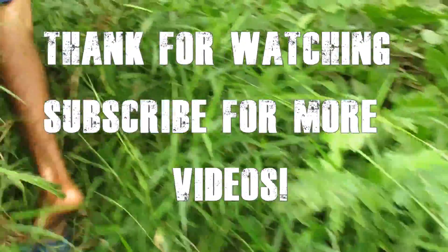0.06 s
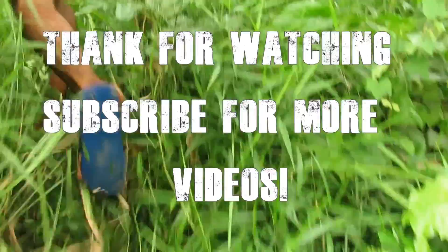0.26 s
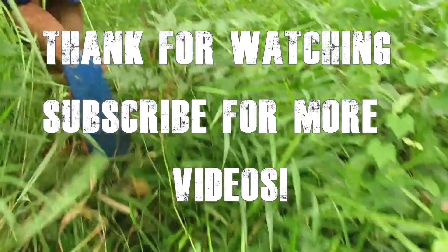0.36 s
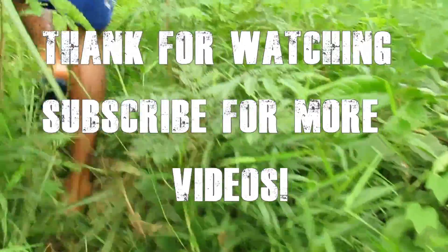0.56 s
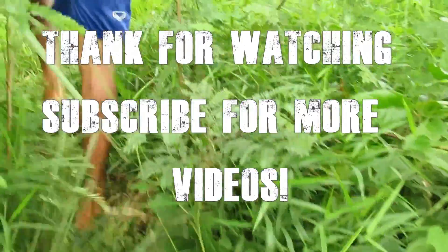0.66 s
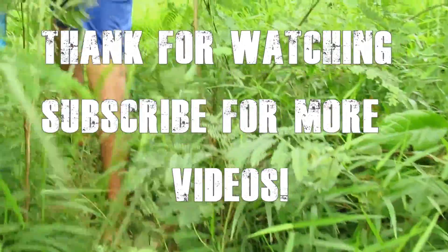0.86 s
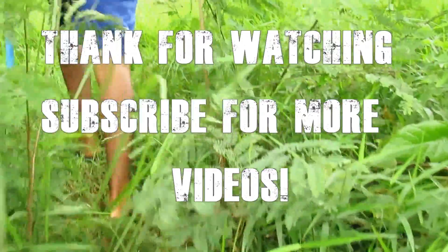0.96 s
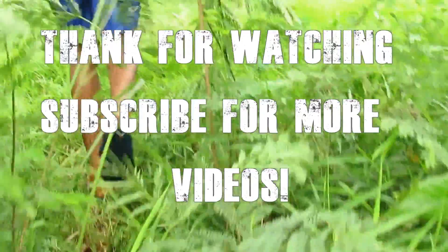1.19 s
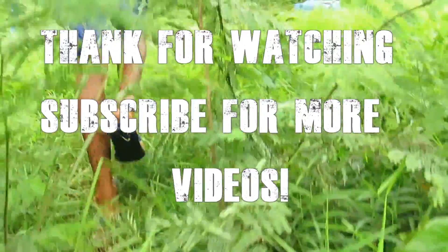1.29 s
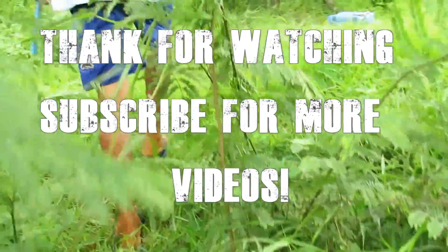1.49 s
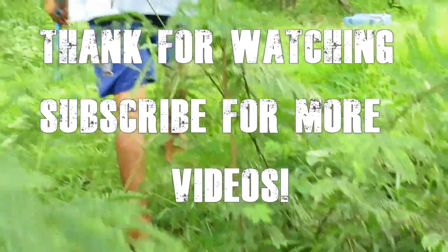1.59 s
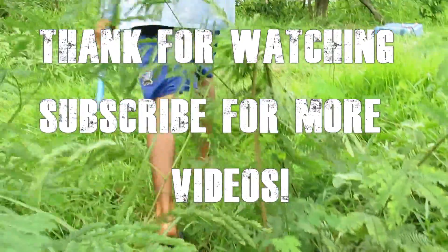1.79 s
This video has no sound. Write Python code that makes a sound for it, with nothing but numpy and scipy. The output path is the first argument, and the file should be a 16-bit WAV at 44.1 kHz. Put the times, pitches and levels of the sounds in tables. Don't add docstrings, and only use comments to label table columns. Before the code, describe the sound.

Steady swishing and crunching of someone walking through thick weeds, twigs cracking, wind rumbling low

```python
import sys
import numpy as np
from scipy import signal
from scipy.fft import rfft, irfft, next_fast_len
from scipy.io import wavfile
from scipy.ndimage import uniform_filter1d, map_coordinates

SR = 44100
rng = np.random.default_rng(int(sys.argv[2]) if len(sys.argv) > 2 else 0)


def put_to_file(sound):
    columns = np.atleast_2d(sound).T
    safe = np.clip(columns, -1, 1)
    whole_steps = np.round(safe * 32767)
    wavfile.write(sys.argv[1], SR, whole_steps.astype(np.int16))


def volts(x):
    e = np.asarray(x, float) / 20
    return 10 ** e


N = 81585

NEAR_LEAD_S, FAR_LEAD_S = 2.7e-5, 1.1e-5
FLAT = [(100, 0), (15000, 0)]


def unit(x):
    return x / np.sqrt(np.mean(x ** 2) + 1e-20)


def along(points, hz):
    f, v = np.transpose(points)
    return np.interp(np.log(hz + 1), np.log(f + 1), v)


def curve(rows):
    return np.interp(np.arange(N) / SR, *np.transpose(rows))


def wobble(rate):
    knots = rng.standard_normal(int(N * rate / SR) + 4)
    return map_coordinates(knots, [np.arange(N) * rate / SR])


def filtered(x, response):
    m = next_fast_len(N + 8192)
    return irfft(rfft(x, m) * response(np.fft.rfftfreq(m, 1 / SR)), m)[..., :N]


def coloured(noise, spectrum):
    return unit(filtered(noise, lambda hz: volts(along(spectrum, hz))))


def wavelet(s, hz, cycles, phase):
    out = np.zeros(N)
    reach = int(5 * cycles / hz * SR) + 2
    near = np.arange(max(int(s * SR) - reach, 0), min(int(s * SR) + reach, N))
    u = (near / SR - s) * hz
    out[near] = np.exp(-.5 * (u / cycles) ** 2) * np.cos(2 * np.pi * u + phase)
    return out


def grains(count, low_hz, high_hz, cycles, spread_db):
    u, k = rng.random((count, 4)), np.arange(256)
    hz = low_hz * (high_hz / low_hz) ** u[:, 1:2]
    rarity = np.minimum(-np.log(u[:, 2:3] + 1e-9), 3)
    size = volts(spread_db * rarity) * np.sqrt(hz)
    ring = np.sin(2 * np.pi * (hz * k / SR + u[:, 3:]))
    tick = size * np.exp(-k / SR * hz / cycles) * ring
    place = (u[:, :1] * N).astype(int) + k
    return unit(np.bincount(place.ravel(), tick.ravel(), N + 256)[:N] * 1.)


def patches(x, depth_db, size, order):
    z = signal.stft(x, nperseg=size)[2]
    field = rng.standard_normal(z.shape[1:])
    field = uniform_filter1d(field, size=order[0], axis=0)
    field = uniform_filter1d(field, size=order[1], axis=1)
    return signal.istft(z * volts(depth_db * unit(field)), nperseg=size)[1][:, :N]


# f/Hz, likeness [0 to 1]
LIKENESS = [(100, 1), (300, 0.95), (1000, 0.92), (2200, 0.9), (4000, 0.5), (7000, 0.6), (14000, 0.68)]


def ports(pair, spectrum, lead_s):
    left_db = -0.1

    def share(hz):
        turn = np.arccos(np.clip(along(LIKENESS, hz), -1, 1)) / 2
        return volts(along(spectrum, hz)) * [np.cos(turn), np.sin(turn)]

    def lead(hz):
        early = np.exp(1j * np.pi * hz * lead_s * np.array([[1], [-1]]))
        return early * volts([[left_db], [-left_db]])

    mid, side = filtered(pair, share)
    return filtered(np.array([mid + side, mid - side]), lead)


def rustle(spectrum, lead_s, patchy_db, ticks, streak_db=3.5):
    bed = patches(rng.standard_normal((2, N)), patchy_db, size=256, order=(6, 8))
    bed = unit(patches(bed, streak_db, size=1024, order=(2, 3)))
    return unit(ports(bed + ticks * np.array([[1], [.5]]), spectrum, lead_s))


# t/s, level/dB
STRIDE_EFFORT = [(0, -44), (.11, -45), (.17, -45.5), (.23, -43.5), (.31, -38), (.41, -40.5), (.44, -44),
                 (.48, -45), (.56, -46.5), (.7, -45), (.88, -48), (1, -43), (1.06, -45), (1.21, -35.5),
                 (1.25, -46), (1.5, -49), (1.7, -42.5), (1.85, -41.5)]
# t/s, level/dB
NEAR_BRUSHING = [(0, -38.5), (.11, -38.5), (.18, -44), (.23, -37), (.32, -35.5), (.5, -36.5), (.58, -38.5),
                 (.7, -34.5), (.78, -36.5), (.88, -39.5), (.98, -39), (1.08, -43), (1.2, -41.5),
                 (1.35, -46.5), (1.5, -50.5), (1.66, -47.5), (1.78, -44.5), (1.85, -40.5)]
# f/Hz, level/dB
CRUNCH_COLOUR = [(70, -22), (150, -3.5), (600, -6.5), (1300, -7), (2400, -9.5), (4600, -18), (8000, -36.5),
                 (15000, -97)]
# f/Hz, level/dB
HISS_COLOUR = [(300, -20.5), (1500, -5.5), (4000, -4), (8000, -4.5), (11000, -3.5), (13000, 0.5),
               (15000, -2.5), (16000, -48.5)]


def legs():
    stalks = volts(-17.5) * grains(count=700, low_hz=365, high_hz=4110, cycles=1.9, spread_db=1.0)
    blades = volts(-8.5) * grains(count=2500, low_hz=3000, high_hz=14600, cycles=1.7, spread_db=3)
    effort_db = curve(STRIDE_EFFORT) + 0.16 * wobble(8.9) + 1.07 * wobble(44.98)
    brushing_db = curve(NEAR_BRUSHING) + 0.2 * wobble(15.6) + 1.35 * wobble(29.93)
    crunch = rustle(CRUNCH_COLOUR, FAR_LEAD_S, patchy_db=-0.7, ticks=stalks)
    hiss = rustle(HISS_COLOUR, NEAR_LEAD_S, patchy_db=1.07, ticks=blades, streak_db=2.5)
    return volts(effort_db) * crunch + volts(brushing_db) * hiss


# t/s, level/dB, half length/s, f/Hz
LEAF_FLICKS = [(.105, -49, .006, 7000), (.233, -36, .005, 12500), (0.323, -30.5, 0.0019, 9900),
               (0.647, -28, 0.0031, 11560), (.649, -33.5, 0.0016, 3470), (0.647, -35, 0.0014, 5900),
               (0.744, -42, 0.016, 10600), (0.996, -39, 0.0087, 6500), (.997, -39.5, 0.013, 12100),
               (1.285, -47.5, 0.0044, 5330), (1.367, -47, .003, 12500), (1.373, -60, 0.0052, 7500),
               (1.556, -52.5, 0.0029, 6600)]
# t/s, level/dB, f/Hz
TIP_TICKS = [(.0285, -31, 10400), (.0973, -27, 12300), (.1059, -29, 10500), (.2332, -36, 11000),
             (.3224, -31, 10300), (.4643, -32, 11400), (.6481, -21, 12500), (.8454, -34, 11100),
             (.9895, -30, 11000), (1.0058, -33, 10400), (1.1841, -42, 10400), (1.3684, -33, 11600),
             (1.3724, -32, 12500), (1.3767, -37, 12500), (1.3775, -36, 11100), (1.5571, -35, 12000),
             (1.6832, -36, 12100), (1.7765, -39, 11800)]


def leaves():
    t = np.arange(N) / SR
    width_octaves, tick_cycles = 0.24, 0.96
    scrape = rustle(FLAT, NEAR_LEAD_S, patchy_db=4, ticks=0)
    out = np.zeros((2, N))
    for s, db, half_s, centre_hz in LEAF_FLICKS:
        band = lambda hz: np.exp(-.5 * (np.log2((hz + 1) / centre_hz) / width_octaves) ** 2)
        swell = np.exp(-.5 * ((t - s) / half_s) ** 2)
        out += volts(db) * swell * unit(filtered(scrape, band))
    for s, db, hz in TIP_TICKS:
        out += volts(db) * wavelet(s, hz, tick_cycles, 0)
    return out


# t/s, level/dB, f/Hz
STEM_SNAPS = [(0.1084, -21.5, 1460), (0.1307, -24, 1200), (.192, -34, 1410), (0.218, -27.5, 1470),
              (.405, -38, 496), (0.476, -29.5, 790), (0.675, -26.5, 1900), (0.9737, -21, 1230),
              (.9972, -19.5, 950), (1.196, -19.5, 720), (1.2175, -31, 910), (1.221, -31, 600),
              (1.204, -28, 567), (1.212, -35, 1490), (1.2175, -29, 1700), (1.371, -33, 890),
              (0.471, -24, 1810), (0.4935, -26, 1900), (0.3094, -27, 1490), (0.5577, -31.5, 1500),
              (0.743, -30, 1810), (1.0643, -38, 1160), (1.6142, -30.5, 1280), (1.738, -30, 1600),
              (.38, -39, 416), (1.3676, -24.5, 580), (1.389, -34, 600), (1.423, -30.5, 1970),
              (1.542, -29, 1260), (1.5444, -25, 2900), (1.138, -33, 1160), (1.6495, -30, 950),
              (1.667, -30.5, 814), (1.777, -28.5, 660), (1.835, -51, 1350)]
# t/s, level/dB, f/Hz
STALK_KNOCKS = [(.9765, -30.5, 1760), (0.35, -35, 430), (.407, -33, 570), (1.5508, -38, 1600),
                (1.2185, -32, 320), (1.199, -31.5, 550), (1.211, -29, 560), (1.2215, -26, 510),
                (1.37, -32, 620), (1.391, -33, 467), (1.113, -32.5, 1180), (1.14, -30, 1200),
                (0.92, -34, 1120), (1.651, -33.5, 1020), (1.835, -40, 1380), (.403, -32, 1750),
                (.381, -32.5, 1280)]


def stems():
    t = np.arange(N) / SR
    snap_cycles, edge_cycles, knock_cycles = 0.36, 0.73, 1.18
    edge_db, splinter_db, splinter_s = -12.5, -16, 0.0095
    click, after = np.zeros(N), np.zeros(N)
    for s, db, hz in STEM_SNAPS:
        p, q = rng.uniform(3.2, 3.46, 2)
        swing = wavelet(s, hz, snap_cycles, p)
        edge = volts(edge_db) * wavelet(s, 3.9 * hz, edge_cycles, q)
        click += volts(db) * (swing + edge)
        after += volts(db + splinter_db - 20 * np.abs(t - s) / splinter_s) * (t > s)
    for s, db, hz in STALK_KNOCKS:
        click += volts(db) * wavelet(s, hz, knock_cycles, np.pi)
    splinters = rustle(CRUNCH_COLOUR, FAR_LEAD_S, patchy_db=2, ticks=0)
    return ports(np.array([click, .5 * click]), FLAT, FAR_LEAD_S) + after * splinters


# t/s, level/dB
AIR_SPEED = [(0, -61), (.14, -40.5), (.2, -45.5), (.4, -41), (.57, -37), (.68, -47), (.74, -37), (.82, -42),
             (.9, -41), (1, -39.5), (1.1, -41.5), (1.2, -40), (1.3, -24.5), (1.46, -28.5), (1.53, -45),
             (1.68, -42), (1.74, -48), (1.85, -56)]
# t/s, level/dB, f/Hz, left over right/dB
WIND_EDDIES = [(0.251, -23, 91, 0.5), (0.275, -25.5, 102, 0), (.388, -28.5, 90, -1), (0.409, -26.5, 79, -1),
               (0.462, -30, 88, -1), (0.499, -26, 90, 2), (0.512, -19.5, 99.4, -1), (0.543, -26, 76, -1),
               (0.56, -18.5, 92, -3), (.596, -19, 107, -2.5), (0.608, -18.5, 91, 1), (.651, -16.5, 90, 2),
               (0.73, -30.5, 82, -2), (0.756, -25, 101, -3.5), (1.164, -31, 76.4, 2.5), (1.185, -29, 91, 3),
               (1.246, -16.5, 71, 4), (1.281, -21, 71, -7), (1.294, -21.5, 84.6, 5),
               (1.311, -22.5, 74.6, -4), (1.336, -25, 55, 0), (1.366, -15, 91, -5), (1.394, -20, 82, 1),
               (1.4075, -18, 91, -8.5), (1.4332, -20, 91, -7), (1.427, -28.5, 168, -5),
               (1.4535, -18.5, 67.5, 0), (1.321, -29, 85, 2), (1.474, -35.5, 81.4, -15),
               (1.572, -25, 142, -5), (0.577, -26, 55, 0), (1.262, -24, 76, 1), (.136, -38.5, 95, -1),
               (0.3083, -44, 81, 0), (.634, -43, 70, -1), (0.691, -37, 90, 3), (.742, -25.5, 87, -3),
               (.776, -35, 95, -1), (.835, -36.5, 74.4, 0), (1.035, -35, 80, 2), (1.149, -39, 74.5, 0),
               (1.215, -30, 100, -6), (1.229, -24.5, 111, -1), (1.354, -30, 95, 8), (1.492, -33.5, 89, 1),
               (1.516, -33, 94, -2), (1.5375, -32.5, 95, 1), (1.602, -37.5, 78, -1), (1.634, -39.5, 85, -1),
               (1.664, -34.5, 71, 0)]
# f/Hz, level/dB
RUMBLE_COLOUR = [(15, -31), (40, 1.5), (75, 0.5), (130, -12.5), (200, -23), (300, -30), (600, -105.5)]
# f/Hz, level/dB
HEAVE_COLOUR = [(15, -33), (30, 3), (48, 6.5), (70, -10), (110, -46), (200, -70)]
# f/Hz, level/dB
TURBULENCE_COLOUR = [(15, -60), (50, -19), (120, -5), (190, -8.5), (280, -19.5), (500, -43)]


def wind():
    t = np.arange(N) / SR
    swing_cycles, crest_cycles, eddy_db, crest_db = 0.41, 0.95, 2, -18
    swing_pan, crest_pan = 0.71, 2.63
    turbulence_db, turbulence_s, heave_db, heave_s = -20, 0.0092, -8, 0.09
    thumps, stir = np.zeros((2, N)), np.zeros(N)
    for s, db, hz, pan_db in WIND_EDDIES:
        phase = rng.uniform(-.5, .5)
        pan = np.array([[pan_db / 2], [-pan_db / 2]])
        swing = wavelet(s, hz, swing_cycles, phase - 0.3)
        crest = volts(crest_db) * wavelet(s, 2 * hz, crest_cycles, 2 * phase - 0.3)
        thumps += volts(db + eddy_db) * (swing * volts(swing_pan * pan) + crest * volts(crest_pan * pan))
        stir += volts(2 * db) * np.exp(-((t - s) / turbulence_s) ** 2)
    air = volts(curve(AIR_SPEED) + 3.7 * wobble(37.2))
    noise = rng.standard_normal((3, N))
    heave = volts(heave_db) * np.sqrt(np.abs(uniform_filter1d(stir, int(heave_s * SR))))
    mid = heave * coloured(noise[2], HEAVE_COLOUR) + air * coloured(noise[0], RUMBLE_COLOUR)
    turbulence = volts(turbulence_db) * np.sqrt(stir + 0.12 * air ** 2)
    side = turbulence * coloured(noise[1], TURBULENCE_COLOUR)
    return thumps + np.array([mid + side, mid - side])


def scene():
    return legs() + leaves() + stems() + wind()


def band_limit(x):
    return signal.sosfilt(signal.butter(12, 15760, fs=SR, output="sos"), x)


def record(dry):
    bass_hz, top_hz = 31.4, 15760
    mix = filtered(dry, lambda hz: (1j * hz / (bass_hz + 1j * hz)) ** 2 * (hz < top_hz))
    return band_limit(mix)


dry = scene()
out = record(dry)
put_to_file(out)
```